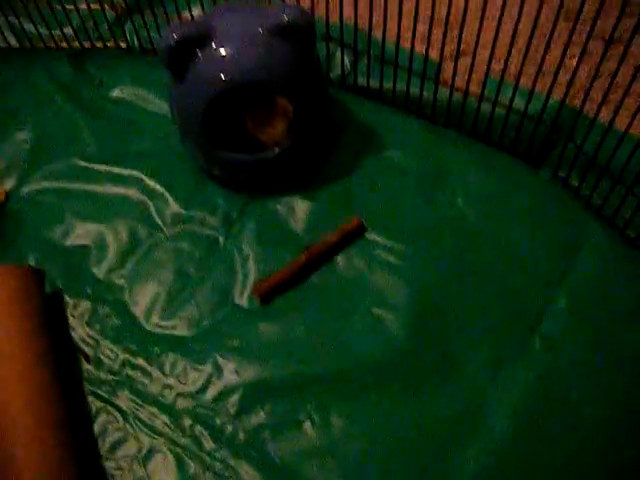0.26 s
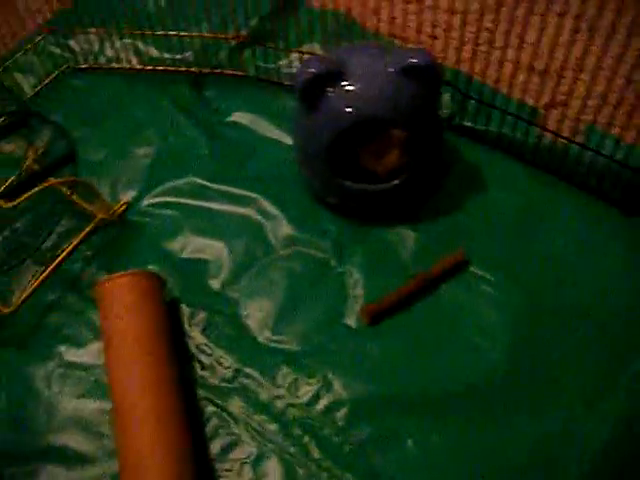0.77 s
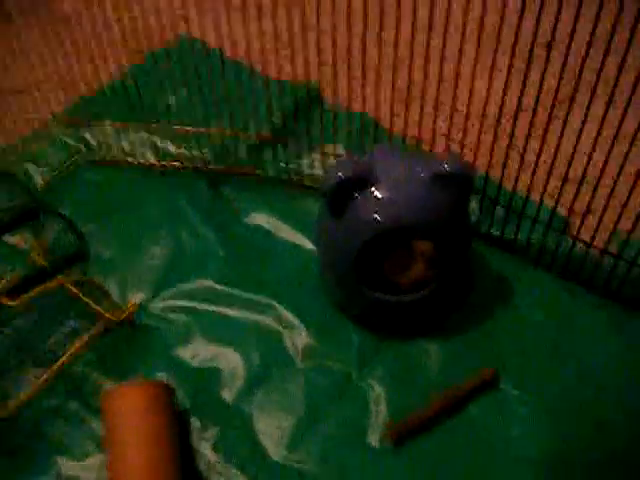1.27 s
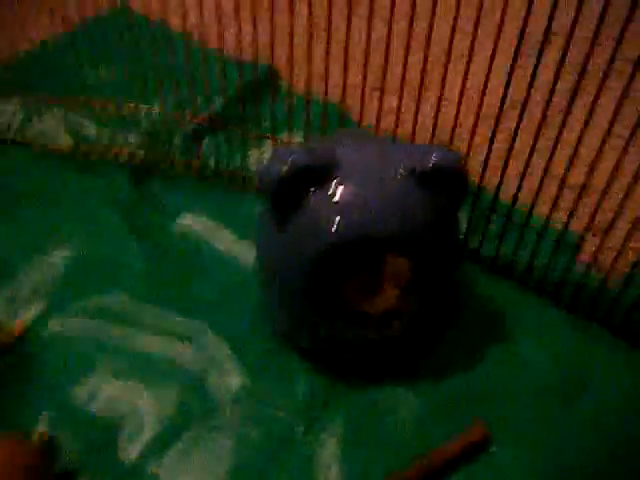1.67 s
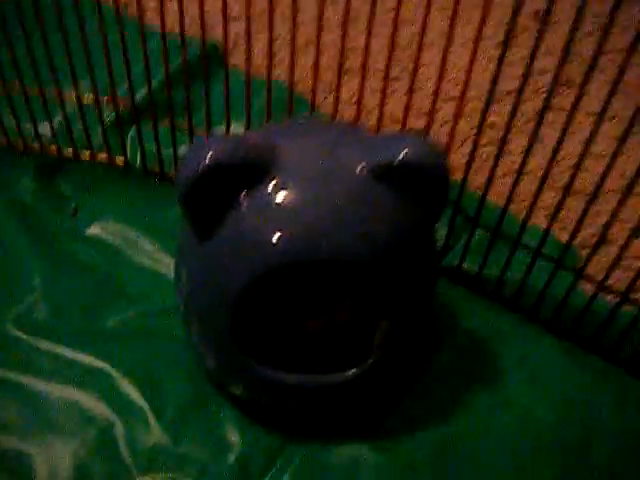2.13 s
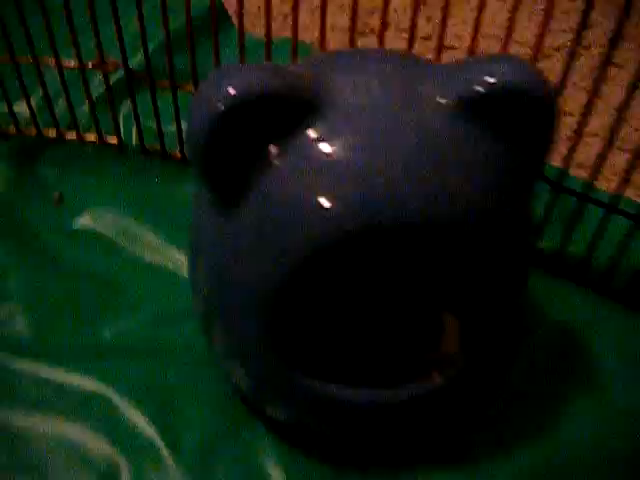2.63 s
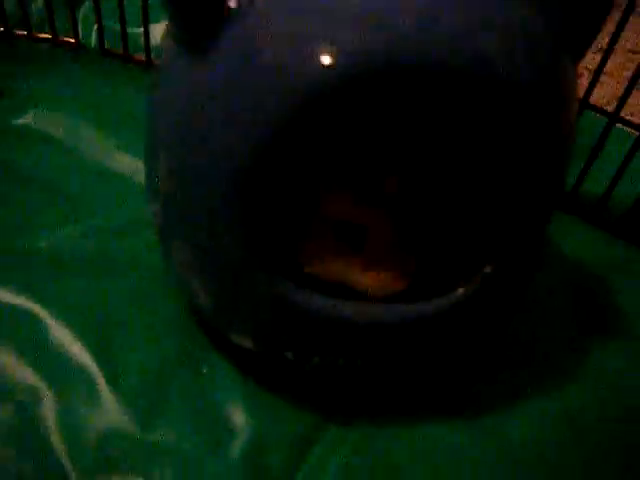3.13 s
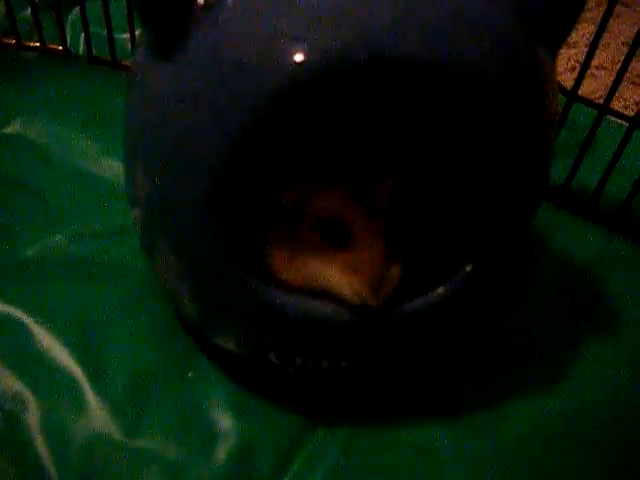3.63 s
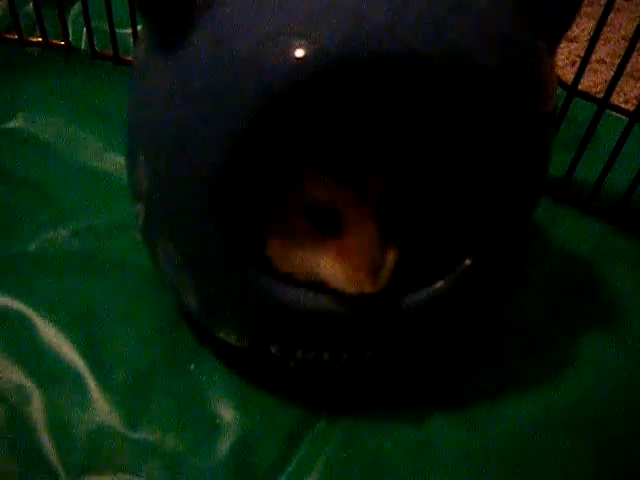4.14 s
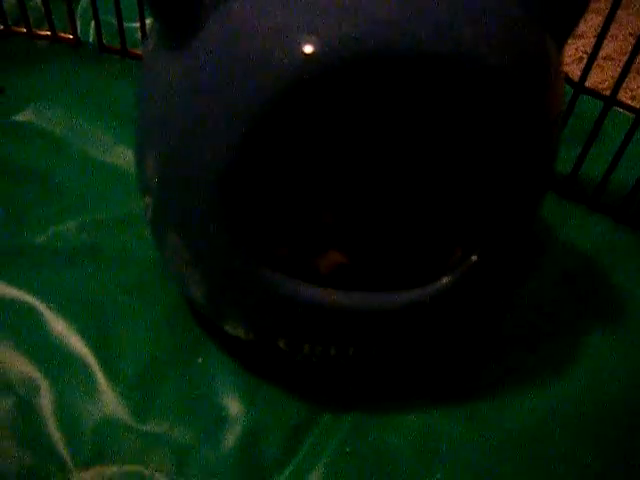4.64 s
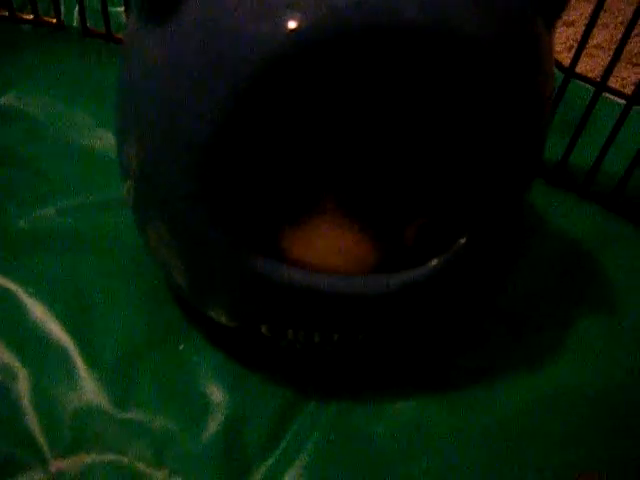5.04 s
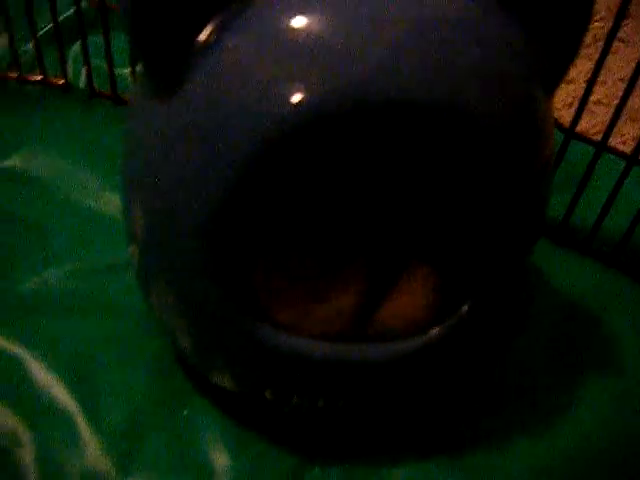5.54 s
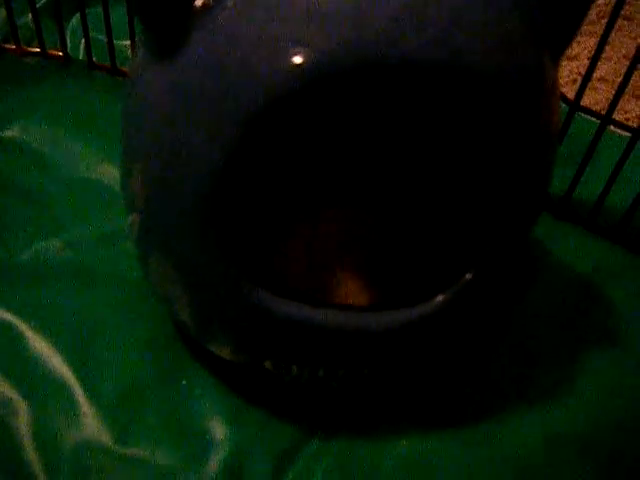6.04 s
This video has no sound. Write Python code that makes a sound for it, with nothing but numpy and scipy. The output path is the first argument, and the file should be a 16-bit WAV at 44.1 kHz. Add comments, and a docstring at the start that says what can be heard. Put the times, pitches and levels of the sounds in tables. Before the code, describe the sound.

A deep motor hum near 120 Hz throbs almost three times a second throughout, under faint hiss, a very thin high whine and low handling rustle, strongest in the first 1.5 seconds. Close and dry, a hamster's paws rasp plastic in quick gritty strokes from 0.1 to 0.8 s, with a crease snap at 0.34. A bright wire chink comes at 1.03, snaps around 1.25, and a dull hollow knock at 1.36. From 1.6 to 1.9 a rubbing scrape makes the shell sing and squeak. Scratching is densest from 1.95 to 3.25, with sharp ticks near 2.4 and strong, ringing knocks at 2.73, 2.96 and 3.15. Scattered clicks follow at 3.4 to 3.8, then sparse faint scrapes. A loud, dry snap stands out at 4.61, small clicks near 4.8, hard bright rim taps at 5.29 and 5.45, faint wire touches around 6, and a soft tap at 6.2.

```python
"""Hamster in a plastic hideout, close up

A quiet room with a small hand-held camera close to a hard plastic hideout on a plastic cage liner.
Paws scrape in short strokes of gritty slips; claws tick and liner creases snap as brief noise pulses.
Knocks, rim taps and cage-wire chinks ring damped modes, and a long rub makes the shell sing.
Behind them an appliance motor throbs in drifting sines, a hand rustles low, and the camera hisses and whines."""
import sys
import numpy as np
from scipy import signal
from scipy.fft import rfft, irfft, next_fast_len
from scipy.io import wavfile
from scipy.ndimage import uniform_filter1d

SR = 44100
rng = np.random.default_rng(int(sys.argv[2]) if len(sys.argv) > 2 else 0)


def output_pcm(signal):
    """Save a mono or channel-first signal as 16-bit PCM at the path in sys.argv[1].

    Samples are clipped to [-1, 1] before scaling.
    """
    pcm = np.clip(np.atleast_2d(signal).T, -1, 1) * 32767
    wavfile.write(sys.argv[1], SR, np.round(pcm).astype(np.int16))


N = 277830
TIME = np.arange(N) / SR  # s
BRIEF = TIME[:8192]  # time axis of one brief sound, s

# Levels in the tables are relative; the functions trim and mix them.
# steady tones, deep motor hum first and camera whine last: (frequency [Hz], level [dB])
HUM_TONES = [(119.99, -34), (239.94, -56.5), (182.57, -54), (242.8, -65), (15734, -69)]
# beats in the deep hum: (rate [Hz], time of a crest [s], depth [dB])
HUM_THROBS = [(2.85, .04, 1.9), (1.04, .78, .8)]
# the hum's upper tones grow as the camera leans in: (time [s], level [dB])
HUM_OVERTONES = [(1.5, -6.5), (2.5, -.5)]
# spectrum of room air and camera hiss: (frequency [Hz], density [dB per Hz])
AIR_SPECTRUM = [(20, -4.5), (40, -12), (55, 2.5), (90, -6), (160, 2.5), (220, -2), (350, -4.5),
                (500, -10.5), (1000, -15), (2000, -18), (5000, -22.5), (10000, -24.5), (15500, -22)]
# low rustle of the hand that holds the camera: (time [s], level [dB])
HAND_RUSTLE = [(0, -54.5), (.5, -53.5), (.9, -60.5), (1.3, -52.5), (1.7, -67), (2.3, -62), (3.0, -55),
               (3.6, -65), (6.3, -65)]

# how busily the hamster shuffles between the strokes: (time [s], level [dB])
SHUFFLE_ACTIVITY = [(0, -56), (.33, -52.5), (.6, -55.5), (.98, -52), (1.13, -64), (1.33, -57),
                    (1.56, -61.5), (1.74, -56), (2.22, -48.5), (2.47, -55.5), (2.76, -47), (3.25, -59),
                    (3.49, -58), (3.95, -66), (4.38, -57.5), (4.82, -62.5), (5.08, -65), (6.3, -66)]
# the clearest paw strokes: (time [s], nominal length [s], rasp [dB], hiss [dB])
PAW_STROKES = [(0.106, 0.053, -45, -49.5), (0.222, 0.028, -45, -50.5), (0.298, 0.026, -43, -50),
               (0.528, 0.028, -51, -51.5), (0.688, 0.12, -43.5, -52.5), (0.78, 0.12, -42, -49.5),
               (1.604, 0.071, -43.5, -45), (1.95, 0.04, -45.5, -48), (2.034, 0.028, -41.5, -48),
               (2.113, 0.051, -40, -48), (2.156, 0.026, -38.5, -39.5), (2.412, 0.028, -44.5, -44.5),
               (2.54, 0.078, -48.5, -50), (2.648, 0.051, -44, -52.5), (2.688, 0.051, -40.5, -45),
               (2.754, 0.077, -41.5, -58), (3.056, 0.022, -44.5, -46), (3.098, 0.051, -47.5, -53),
               (3.251, 0.014, -49.5, -47.5), (4.135, 0.077, -50, -53.5), (4.335, 0.13, -55, -55),
               (4.626, 0.028, -48, -58), (4.752, 0.094, -56.5, -66), (5.182, 0.023, -52.5, -60),
               (5.222, 0.014, -56, -49), (5.251, 0.011, -56, -51), (5.354, 0.025, -54.5, -48.5)]
# spectrum of claws rasping on plastic: (frequency [Hz], density [dB per Hz])
RASP_SPECTRUM = [(200, -14), (600, -8.5), (880, 6), (1500, 2.5), (2200, 1.5), (3500, 2.5), (5500, -3),
                 (7000, -12), (9000, -5), (16000, -23.5)]
# spectrum of fur hiss and bright claw ticks: (frequency [Hz], density [dB per Hz])
HISS_SPECTRUM = [(2500, -9), (5000, 5), (6700, 6.5), (9500, 1), (12500, 3), (15500, -3)]
# thin sizzle of a light, quick flick: (frequency [Hz], density [dB per Hz])
SIZZLE_SPECTRUM = [(6000, -26), (9000, -8), (11200, -3), (13500, -3), (14800, -4), (15800, -7)]
# loudest claw ticks and snapping creases; a stiffer crease snaps higher:
# (time [s], pitch factor [1], snap [dB], tick [dB])
LINER_CLICKS = [(0.338, 1.25, -30, -42), (0.9264, 0.91, -32.5, -49), (1.009, 1, -35, -37),
                (1.243, 1.3, -35.5, -47), (1.259, 1.03, -29, -37), (1.269, 2, -32, -42),
                (1.5302, 1.4, -32.5, -28), (2.034, 1.4, -28, -27.5), (2.228, 1.3, -30, -30),
                (2.4174, 1.6, -40, -21.5), (2.888, 0.78, -30, -50), (3.024, 0.87, -30, -30),
                (3.2518, 0.89, -41, -36), (3.366, 0.58, -33, -45), (3.426, 1, -33, -43),
                (3.4662, 0.74, -35, -35), (3.4778, 0.57, -31.5, -33.5), (3.756, 1.5, -30, -43),
                (4.334, 1.3, -33, -38), (4.6102, 1, -16, -27), (4.7763, 0.72, -43, -33),
                (4.8338, 1.1, -38.5, -37.5)]
# spectrum of a crease snapping at pitch factor 1: (frequency [Hz], density [dB per Hz])
SNAP_SPECTRUM = [(200, -42), (550, -4), (950, -2), (1550, -3), (2100, 4.5), (3500, -4.5), (5500, -8.5),
                 (9000, -22.5), (16000, -24)]

# light touches on the cage wire: (time [s], pitch [Hz], ring [dB], chatter [dB])
WIRE_CHINKS = [(1.0262, 5930, -36, -23), (4.097, 5260, -55, -39.5), (5.95, 5300, -55, -44),
               (6.073, 5220, -46.5, -44)]
# modes of the wire: (multiple of the pitch [1], t60 [s], level [dB])
WIRE_MODES = [(1, .11, 0), (1.022, .07, -6), (2.01, .06, -12), (2.19, .07, -10), (2.5, .07, -11)]
# spectrum of the wire's chatter: (frequency [Hz], density [dB per Hz])
CHATTER_SPECTRUM = [(1000, -13), (3200, -16), (4900, -2.5), (6200, -8), (8500, -21), (12500, -2),
                    (16000, -17)]

# knocks on the hideout: (time [s], pitch factor [1], then thud, hollow, body, ring, tick [dB])
SHELL_KNOCKS = [(1.363, 1.1, -15.5, -21, -35, -31.5, -37), (1.6046, 0.95, -23, -26.5, -39, -38, -38),
                (2.257, 0.82, -48, -25.5, -24, -34.5, -35), (2.29, 1.05, -26.5, -23, -30, -39, -35),
                (2.5416, 1.09, -26, -27.5, -73, -26, -35), (2.7284, 1.045, -25.5, -15, -12, -5, -15),
                (2.9581, 0.99, -14, -11, -56, -4.5, -24), (3.1515, 0.96, -19, -20.5, -8.5, -5, -18)]
# where the five knock levels apply, before the pitch factor: (frequency [Hz])
KNOCK_BANDS = [350, 800, 1900, 3100, 7000]
# modes of the shell at pitch factor 1: (frequency [Hz], t60 [s], level [dB])
SHELL_MODES = [(320, 0.02, -5.5), (675, 0.025, -4), (870, 0.005, 2), (1354, 0.011, -3),
               (1830, 0.0058, -0.5), (2290, 0.011, -2.5), (2440, 0.005, -2.5), (3070, 0.008, 2.5),
               (3890, 0.0075, -9), (6860, 0.0025, -3.5)]
# pressure of the long rub that makes the shell sing: (time [s], level [dB])
RUB_PRESSURE = [(1.58, -88), (1.615, -44.5), (1.65, -43.5), (1.675, -50), (1.765, -47.5), (1.8, -63),
                (1.82, -54), (1.855, -48), (1.89, -86)]

# hard taps on the doorway rim: (time [s], thump [dB], body [dB], tick [dB])
RIM_TAPS = [(3.7568, -52, -32.5, -27), (5.2935, -27, -21, -17.5), (5.4401, -27.5, -30, -53),
            (5.4477, -19, -26.5, -10.5), (6.195, -35, -49, -67)]
# where the three tap levels apply: (frequency [Hz])
TAP_BANDS = [700, 1400, 9000]
# modes of the rim: (frequency [Hz], t60 [s], level [dB])
RIM_MODES = [(553, .013, -0.5), (736, 0.0094, -2), (1345, 0.011, -4), (3100, 0.0042, -1), (3780, 0.016, -9),
             (6740, 0.0068, -5), (12600, 0.0025, -13), (16000, 0.0046, -6)]

# the claws catch early in every stroke: share of its length, tick over its rasp (dB)
CATCH_SHARE, CATCH_DB = .15, 6.5
# the paw skids with every knock: nominal length (s), rasp and hiss against the knock's ring (dB)
SKID_S, SKID_RASP_DB, SKID_HISS_DB = .028, -39, -44
# a click rebounds, weaker each time: gap (s), step (dB)
REBOUND_S, REBOUND_DB = .003, -15
# the microphone's treble notch and the upper limit (Hz)
MIC_NOTCH_HZ, TOP_HZ = 7850, 15900


def undb(db):
    """Decibels to gain."""
    return 10 ** (np.asarray(db) / 20)


def unit(x):
    """Scale to rms 1."""
    return x / np.sqrt(np.mean(x ** 2))


def curve(rows):
    """Gain over time from rows of (time [s], level [dB])."""
    return undb(np.interp(TIME, *np.transpose(rows)))


def add(out, s, x):
    """Mix x into out from time s."""
    i = max(int(s * SR), 0)
    out[i:i + len(x)] += x[:len(out[i:])]


def fade(t60):
    """Exponential decay of a brief sound, 60 dB down after t60 seconds."""
    return np.exp(-np.log(1000) * BRIEF / t60)


def colour(x, points):
    """Causal, minimum-phase filter with the given (frequency [Hz], level [dB]) spectrum."""
    size = next_fast_len(len(x) + len(BRIEF)) * 2
    hz, db = np.transpose(points)
    bins_hz = np.arange(size // 2 + 1) * SR / size
    log_gain = np.log(undb(np.interp(np.log(bins_hz + 1), np.log(hz), db)))
    # folding the cepstrum onto positive time makes the filter causal
    cepstrum = irfft(log_gain)
    cepstrum[1:size // 2] *= 2
    cepstrum[size // 2 + 1:] = 0
    return irfft(rfft(x, size) * np.exp(rfft(cepstrum)))[:len(x)]


def walk(rate):
    """Smooth random wandering, spread near 1, from about rate new values a second."""
    k = int(SR / rate)
    steps = np.repeat(rng.standard_normal(N // k + 1), k)
    smooth = uniform_filter1d(uniform_filter1d(steps, k), k)
    return unit(smooth[:N])


def grit(rate, spread_db):
    """Tiny slips at random moments, about rate a second, a few much larger than the rest."""
    size = undb(spread_db * np.minimum(rng.exponential(size=N), 4))
    slips = rng.random(N) < rate / SR
    return unit(slips * size * rng.choice([-1, 1], N))


def crack(t60):
    """A bright burst of noise at the moment of contact, peak 1."""
    burst = colour(rng.standard_normal(len(BRIEF)) * fade(t60), HISS_SPECTRUM)
    return burst / np.abs(burst).max()


def strike(modes, contact_s):
    """Damped modes after one blow; neighbours swing in opposite senses, soft contact rounds the start."""
    ring = 0
    for k, (hz, t60, db) in enumerate(modes):
        ring = ring + (-1) ** k * undb(db) * fade(t60) * np.sin(2 * np.pi * hz * BRIEF)
    return (1 - np.exp(-BRIEF / contact_s)) * ring


def hum(level_db, wander_db):
    """The motor slips against the mains, so its deep hum throbs; weaker tones waver, the whine holds level."""
    throb = wander_db * walk(rate=11.0)
    for hz, crest_s, db in HUM_THROBS:
        throb = throb + db * np.cos(2 * np.pi * hz * (TIME - crest_s))
    tones = []
    for hz, db in HUM_TONES:
        phase = 2 * np.pi * (hz * TIME + rng.random()) + 0.037 * walk(rate=1.9)
        tones.append(np.sqrt(2) * undb(db) * np.sin(phase))
    deep, *upper, whine = tones
    wavering = sum(undb(2 * walk(rate=6)) * tone for tone in upper)
    return undb(level_db + throb) * deep + curve(HUM_OVERTONES) * wavering + whine


def air_and_hiss(level_db):
    """Room air and camera hiss: steady coloured noise."""
    return undb(level_db) * unit(colour(rng.standard_normal(N), AIR_SPECTRUM))


def handling():
    """The hand on the camera rustles: low-coloured random slips under a slow level curve."""
    rustle = colour(grit(rate=900, spread_db=1.5),
                    [(150, -22.5), (330, -6.5), (480, -5), (900, -13), (3000, -29.5)])
    return curve(HAND_RUSTLE) * unit(rustle)


def swell(s, length, rise, fall):
    """Attack, hold and release around one stroke; rise and fall are shares of its nominal length."""
    progress = (TIME - s) / length
    return np.clip(np.minimum(progress / rise, (1 - progress) / fall) + .5, 0, 1)


def shifting(points, patchy_db, smooth):
    """Grit whose colour keeps changing as the claws meet new spots of plastic."""
    out = 0
    edges = np.geomspace(180, 17000, num=25)  # Hz
    slips = grit(rate=1800, spread_db=0.5) + smooth * rng.standard_normal(N)
    spectrum, hz = rfft(colour(slips, points)), np.fft.rfftfreq(N, 1 / SR)
    for low, high in zip(edges, edges[1:]):
        band = irfft(spectrum * ((hz >= low) & (hz < high)), N)
        out = out + undb(patchy_db * walk(rate=80)) * band
    return unit(out)


def scrabbling(rasp_db, hiss_db, sizzle_db, lightness, shuffle_db, shuffle_hiss_db,
               rise, fall, hiss_rise, crease_db, claw_db):
    """Claws drag over plastic in dense slips and stray ticks; fur hiss follows as the paw gathers speed."""
    activity = curve(SHUFFLE_ACTIVITY)
    rasp, hiss, sizzle = undb(shuffle_db) * activity, undb(shuffle_hiss_db) * activity, 0
    skids = [(s, SKID_S, ring + SKID_RASP_DB, ring + SKID_HISS_DB) for s, *_, ring, tick in SHELL_KNOCKS]
    for s, length, rasp_level, hiss_level in [*PAW_STROKES, *skids]:
        speed = swell(s, length, hiss_rise, fall)
        rasp = np.maximum(rasp, undb(rasp_level + rasp_db) * swell(s, length, rise, fall))
        hiss = np.maximum(hiss, undb(hiss_level + hiss_db) * speed)
        # the less a stroke rasps against its hiss, the stronger its high sizzle
        flick_db = hiss_level + sizzle_db + lightness * (hiss_level - rasp_level)
        sizzle = sizzle + undb(flick_db) * speed
    grip = unit(undb(1.8 * walk(rate=200)))  # the claws catch and let go
    grain = shifting(RASP_SPECTRUM, patchy_db=2.2, smooth=.4)
    creases = undb(crease_db) * unit(colour(grit(rate=110, spread_db=1), SNAP_SPECTRUM))
    claws = undb(claw_db) * unit(colour(grit(rate=45, spread_db=5.0), HISS_SPECTRUM))
    fur = shifting(HISS_SPECTRUM, patchy_db=-1, smooth=0.46)
    flicks = unit(colour(grit(rate=3400, spread_db=5.5), SIZZLE_SPECTRUM))
    return grip * (rasp * (grain + creases) + hiss * (fur + claws) + sizzle * flicks)


def clicks(snap_db, tick_db, crinkle):
    """A crease snaps in one dead pulse, crinkles briefly and rebounds; claws tick as they catch."""
    out = np.zeros(N)
    for s, pitch, snap, tick in LINER_CLICKS:
        force = crinkle * rng.standard_normal(len(BRIEF)) * fade(t60=0.017)
        force[0] = 1  # the snap itself
        pulse = colour(force, [(hz * pitch, db) for hz, db in SNAP_SPECTRUM])
        click = undb(snap + snap_db) * pulse / np.abs(pulse).max()
        click = click + undb(tick + tick_db) * crack(t60=0.0062)
        for k in range(3):
            add(out, s + k * REBOUND_S, undb(k * REBOUND_DB) * click)
    for s, length, rasp, _ in PAW_STROKES:
        add(out, s + CATCH_SHARE * length, undb(rasp + CATCH_DB) * crack(t60=0.012))
    return out


def chinks(chatter_t60):
    """The wire chatters for an instant against its neighbour and rings on."""
    out = np.zeros(N)
    for s, hz, level, chatter_db in WIRE_CHINKS:
        modes = [(hz * multiple, t60, db) for multiple, t60, db in WIRE_MODES]
        ring = strike(modes, contact_s=0.00046)
        chatter = colour(rng.standard_normal(len(BRIEF)) * fade(chatter_t60), CHATTER_SPECTRUM)
        add(out, s, undb(level) * ring + undb(chatter_db) * chatter / np.abs(chatter).max())
    return out


def knocks(crack_db, contact_s, touch_db, touch_s):
    """Each knock grazes the shell, then rings it; where it lands decides which modes answer."""
    out = np.zeros(N)
    for s, pitch, *bands in SHELL_KNOCKS:
        modes = []
        for hz, t60, db in SHELL_MODES:
            answer_db = np.interp(np.log(hz), np.log(KNOCK_BANDS), bands)
            modes.append((hz * pitch, t60, db + answer_db))
        blow = strike(modes, contact_s) + undb(bands[-1] + crack_db) * crack(t60=0.0087)
        add(out, s - touch_s, undb(touch_db) * blow)
        add(out, s, blow)
    return out


def rub(low_hz, high_hz, low_db, squeal_hz, squeal_db):
    """Friction keeps two strong shell resonances sounding; it squeals where it presses hardest."""
    ring = undb(low_db) * np.sin(2 * np.pi * low_hz * BRIEF) + np.sin(2 * np.pi * high_hz * BRIEF)
    slips = grit(rate=5100, spread_db=1.0)
    body = unit(signal.fftconvolve(slips, ring * fade(t60=0.023))[:N])
    squeal_ring = np.sin(2 * np.pi * squeal_hz * BRIEF) * fade(t60=0.0035)
    squeal = unit(signal.fftconvolve(rng.standard_normal(N), squeal_ring)[:N])
    pressure = curve(RUB_PRESSURE)
    return pressure * (body + undb(squeal_db) * (pressure / pressure.max()) ** 3 * squeal)


def taps(crack_db, contact_s, touch_db, touch_s):
    """A claw brushes the stiff rim, then lands: a small hollow thump under a bright tick."""
    out = np.zeros(N)
    for s, thump, body, tick in RIM_TAPS:
        modes = [(hz, t60, db + np.interp(hz, TAP_BANDS, [thump, body, tick])) for hz, t60, db in RIM_MODES]
        blow = strike(modes, contact_s) + undb(tick + crack_db) * crack(t60=0.0055)
        add(out, s - touch_s, undb(touch_db) * blow)
        add(out, s, blow)
    return out


def room(x, wet_db, t60):
    """A short, weak scatter from the cage and the furnished room, as a decaying noise tail."""
    tail = rng.standard_normal(len(BRIEF)) * fade(t60) * (BRIEF > .003)  # starts after 3 ms
    tail = colour(tail, [(200, -19), (550, -1), (1000, 14.5), (3000, -0.5), (15000, 3)])
    tail = tail / np.sqrt(np.sum(tail ** 2))
    return x + undb(wet_db) * signal.fftconvolve(x, tail)[:N]


def scene():
    """The hamster's close noises in the room, over hum, air and the camera's own sounds."""
    background = hum(level_db=-2.5, wander_db=.5) + air_and_hiss(level_db=-50) + handling()
    hamster = scrabbling(rasp_db=1.05, hiss_db=0, sizzle_db=0.0, lightness=1.0,
                         shuffle_db=1.5, shuffle_hiss_db=-3.5,
                         rise=0.36, fall=0.87, hiss_rise=.55, crease_db=-8.5, claw_db=-6.0)
    hamster += clicks(snap_db=1.5, tick_db=3.5, crinkle=0.16)
    hamster += chinks(chatter_t60=0.063)
    hamster += knocks(crack_db=0.0, contact_s=0.000088, touch_db=-22, touch_s=.0016)
    hamster += rub(low_hz=747, high_hz=3010, low_db=2.0, squeal_hz=6820, squeal_db=9.0)
    hamster += taps(crack_db=-4, contact_s=0.00005, touch_db=-18.5, touch_s=0.0022)
    return (room(hamster, wet_db=-21, t60=0.11) + background)[None]


def record(dry):
    """The microphone has a deep notch in the treble, and the top is cut."""
    notched = signal.lfilter(*signal.iirnotch(MIC_NOTCH_HZ, 3.4, fs=SR), dry)
    heard = 0.92 * notched + 0.055 * dry  # a little direct sound partly fills the notch
    return signal.sosfilt(signal.ellip(10, .2, 70, TOP_HZ, fs=SR, output="sos"), heard)


dry = scene()
out = record(dry)
output_pcm(out)
```